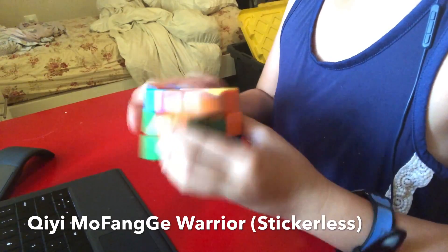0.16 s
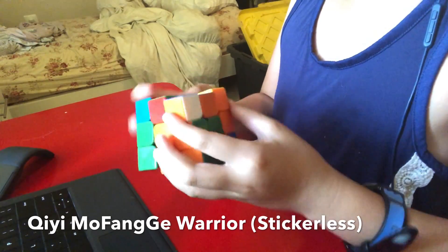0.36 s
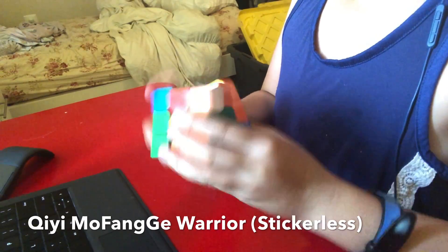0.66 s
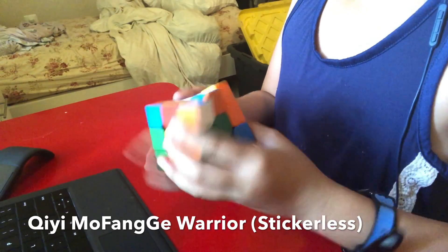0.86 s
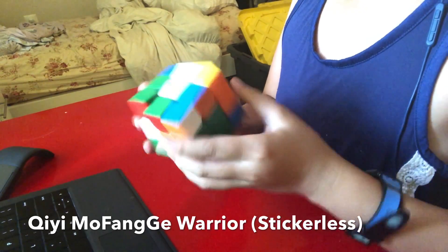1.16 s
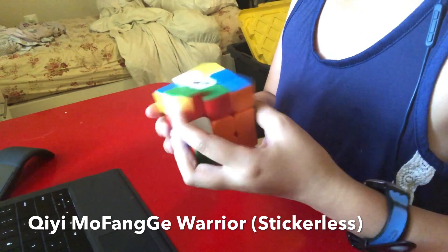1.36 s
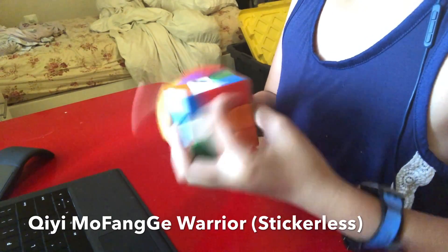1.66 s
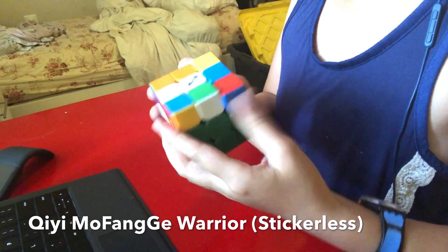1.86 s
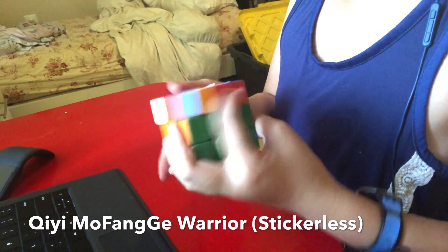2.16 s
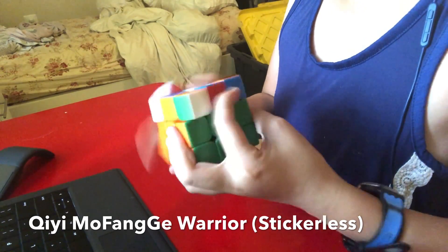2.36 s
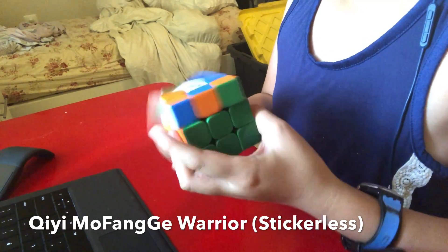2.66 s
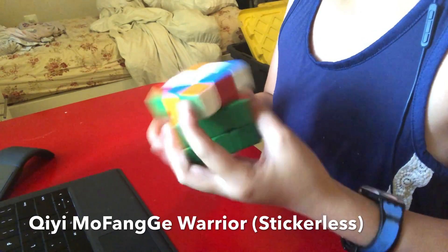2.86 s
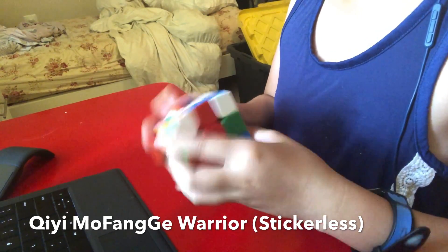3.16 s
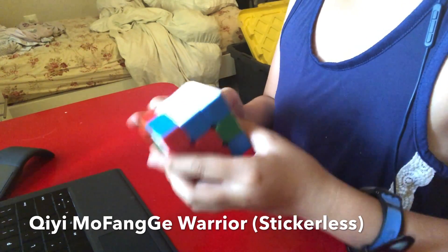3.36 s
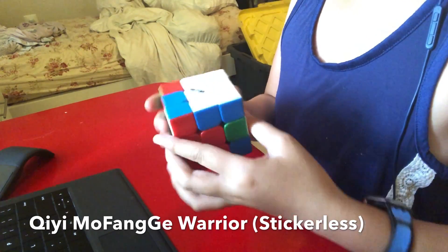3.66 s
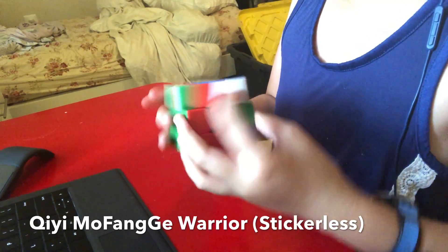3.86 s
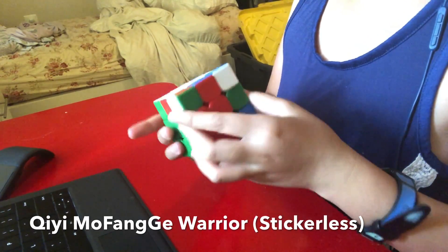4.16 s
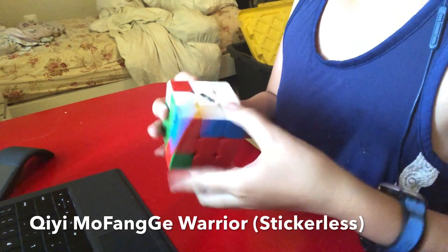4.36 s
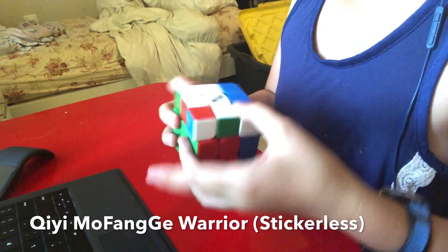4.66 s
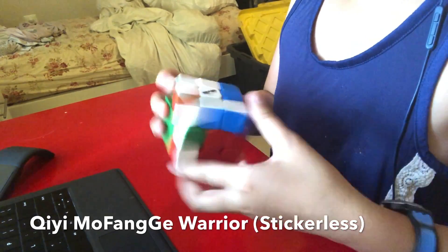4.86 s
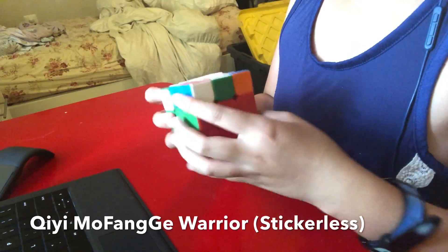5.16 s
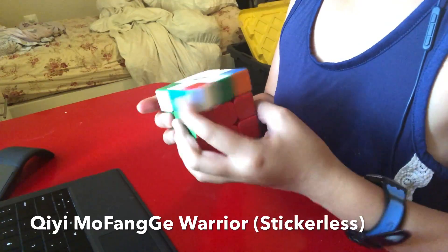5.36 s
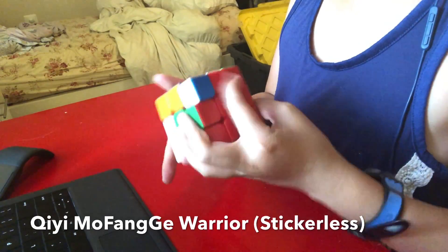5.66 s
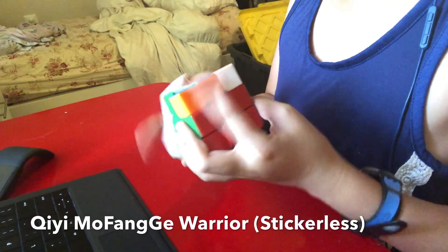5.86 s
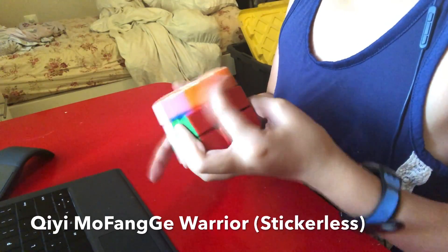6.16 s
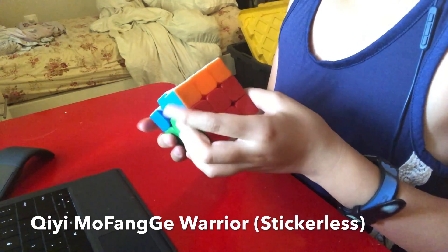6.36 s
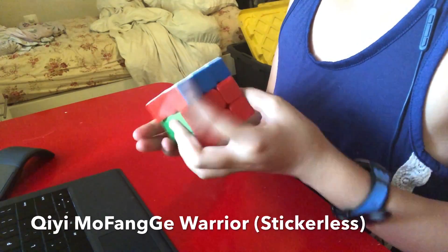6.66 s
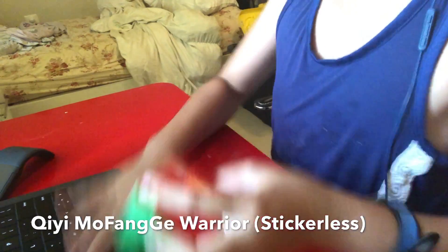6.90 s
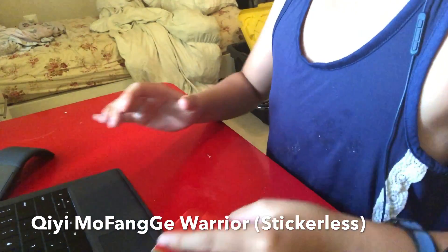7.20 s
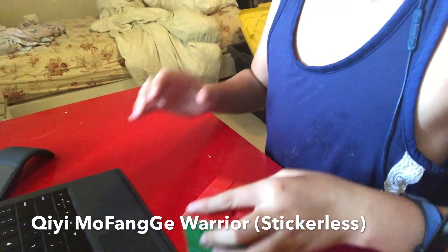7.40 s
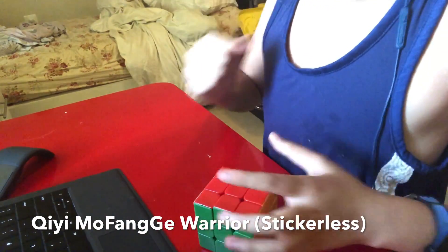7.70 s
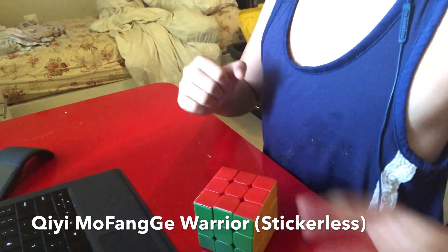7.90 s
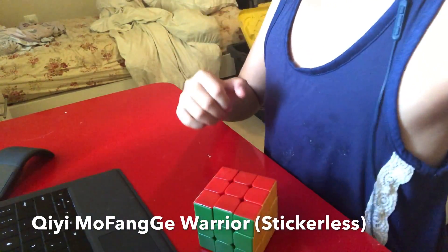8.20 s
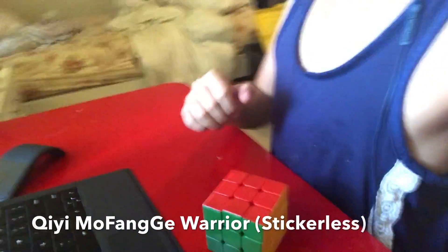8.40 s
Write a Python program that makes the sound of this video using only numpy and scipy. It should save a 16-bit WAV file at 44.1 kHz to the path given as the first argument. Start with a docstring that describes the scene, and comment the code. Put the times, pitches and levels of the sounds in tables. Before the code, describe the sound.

Rapid, dry plastic clacking with brief pauses close to the microphone, faint hum behind, ending in a hard table knock and small nudging bumps.

```python
"""A plastic puzzle cube is turned fast in two hands close to the microphone, in a small furnished room.
Hum and faint hiss run throughout; in the first four seconds a far-off engine revs up through its gears.
Each clack is a burst of tiny collisions ringing hollow plastic, with loose pieces ticking around it.
Near 7 s the cube drops on a table and is nudged about: damped modes of the top knock and boom,
the plastic ticks. Decaying noise echoes answer the cube and table; engine and hum are tones and noise bands."""
import sys
import numpy as np
from scipy import signal
from scipy.fft import rfft, irfft, next_fast_len
from scipy.io import wavfile
from scipy.ndimage import uniform_filter1d

SR = 44100
rng = np.random.default_rng(int(sys.argv[2]) if len(sys.argv) > 2 else 0)


def wav_record(signal):
    """Record a signal, one row per channel, as 16-bit PCM in the file named by sys.argv[1]."""
    frames = np.transpose(np.atleast_2d(signal))
    bounded = np.clip(frames, -1, 1)
    # unit amplitude maps onto the largest positive 16-bit level
    quanta = np.round(bounded * 32767).astype(np.int16)
    wavfile.write(sys.argv[1], SR, quanta)


N = 376613
TIME = np.arange(N) / SR  # s

# Broad room noise, relative spectrum: (frequency [Hz], density [dB per Hz])
AIR_SPECTRUM = [(24, -31), (40, -8), (96, -18), (287, -18.5), (359, -17.5), (407, -18.5), (591, -29.5),
                (704, -27.5), (1280, -34.5), (2510, -34.5), (15500, -48)]
# Wavering hum bands: (frequency [Hz], width [Hz], level [dB])
HUM_BANDS = [(49.4, 10, -71), (129.8, 3.2, -70.5), (184, 12, -72), (239, 18, -74.5), (283.7, 38, -66)]
# Far engine, one list per pull: (time [s], firing rate [Hz], level [dB])
ENGINE_PULLS = [
    [(0, 53.9, -75), (.45, 60.8, -68), (.78, 76.2, -59.5), (.92, 80, -65)],
    [(1.5, 86.7, -86.5), (2.2, 80.7, -66), (2.45, 64.2, -64), (2.8, 64, -59.5), (3.0, 72, -60),
     (3.2, 83, -67)],
    [(3.2, 50.9, -68), (3.33, 59, -49), (3.46, 69.6, -46.5), (3.56, 78, -63), (3.95, 90, -68.5)],
]
# Table top, knocking modes: (frequency [Hz], relative level [dB])
TABLE_MODES = [(330, -13.5), (480, -2), (720, 2), (1000, 0), (1300, -0.5), (1800, -21.5)]
# Table top, low booming modes: (frequency [Hz], relative level [dB])
BOOM_MODES = [(65, -6.5), (125, 6.5), (185, 2.5), (235, 8.5)]
# Cube and hand on the table top; tick and boom are relative to the knock's peak:
# (time [s], peak level [dB], plastic tick [dB], boom [dB])
TABLE_KNOCKS = [(6.922, -9, 2.5, -22), (6.934, -18, -16, -13.5), (6.974, -38, 8.5, 3),
                (7.109, -35.5, 0.5, -8.5), (7.184, -61.5, 8, 6.5), (7.384, -30.5, -2.5, -7),
                (7.411, -31.5, -8, -12), (7.443, -28, -5, -12), (7.49, -40, -11, -3),
                (7.524, -32, -18.5, -8), (8.359, -31.5, -30, -39), (8.368, -37, -22, -1.5),
                (8.393, -41, -26, -19), (8.441, -36, -41.5, -7), (8.461, -34.5, -36, -9),
                (8.492, -28.5, -40, -13), (8.52, -20, -9, -12.5)]
# Hollow plastic pieces, mid-range ring: (frequency [Hz], relative level [dB])
SHELL_MID_MODES = [(680, -20), (1420, -7.5), (1850, -3), (2250, 0), (2800, 3.5), (3350, 3)]
# Hollow plastic pieces, treble ring: (frequency [Hz], relative level [dB])
SHELL_TREBLE_MODES = [(4200, -1), (5100, -0.5), (6100, 7), (7200, 5), (8150, 1), (10200, -6.5), (12800, -4),
                      (14900, -9.5)]
# Pieces snapping against each other: (time [s], level [dB], rattle length [ms])
SNAPS = [(0.0023, -25.5, 1.65), (0.0368, -36, 0.74), (0.0894, -39, 1.3), (0.1603, -33.5, 0.68),
         (0.1713, -25.5, 3.3), (0.194, -26.5, 0.85), (0.216, -32, 3.2), (0.2271, -18, 2.6),
         (0.2498, -20.5, 12), (0.3407, -30, 3), (0.351, -33, 3.6), (0.4891, -26, 1.24), (0.518, -43, 1.1),
         (0.5764, -42, 0.8), (0.588, -42, 0.81), (0.674, -40, 1.5), (0.6873, -31.5, 0.53),
         (0.6978, -28, 3.6), (0.7275, -37.5, 0.8), (0.7422, -30.5, 1.4), (0.7495, -30.5, 1.5),
         (0.773, -26.5, 1.4), (0.826, -33.5, 1.1), (0.8311, -19, 1.5), (0.9865, -24.5, 2.1),
         (1.061, -39.5, 0.94), (1.099, -30, 1.4), (1.1086, -23.0, 0.96), (1.1317, -7, 0.92),
         (1.152, -19, 1.9), (1.278, -46, 1.1), (1.379, -53, 2), (1.42, -51, 2.1), (1.462, -21, 2.3),
         (1.4685, -24, 0.44), (1.4861, -11.0, 0.71), (1.4933, -24, 8.6), (1.569, -26.0, 1.15),
         (1.594, -26.5, 2.9), (1.6196, -27, 4.8), (1.6385, -13, 0.96), (1.6611, -17.0, 4.5),
         (1.6817, -23, 0.98), (1.7148, -26.5, 1.7), (1.7367, -19.5, 2.5), (1.746, -22.0, 4.2),
         (1.8625, -32, 1.75), (1.8894, -34.5, 1.05), (1.9073, -41, 1), (2.1459, -23.5, 1.65),
         (2.159, -17, 0.53), (2.1822, -18, 1.4), (2.201, -19, 3.3), (2.2129, -16.0, 2.5),
         (2.2223, -12.5, 3.8), (2.2395, -22, 3.5), (2.2503, -23.5, 2.2), (2.2866, -41.5, 2.7),
         (2.3076, -45.5, 5.2), (2.3132, -30.5, 1), (2.3394, -35.0, 0.45), (2.378, -29.5, 4.4),
         (2.402, -13.5, 1), (2.418, -26, 5.2), (2.449, -16.5, 2.2), (2.474, -14.5, 2.44),
         (2.564, -28.5, 2.8), (2.579, -18.5, 0.38), (2.6, -17.5, 5.4), (2.6098, -25, 0.44),
         (2.619, -23.5, 1.3), (2.6997, -23.5, 2.6), (2.7246, -15, 1.04), (2.757, -18.5, 2),
         (2.7762, -28, 0.91), (2.7859, -15, 0.61), (2.7924, -21, 2.7), (2.8157, -11.5, 1.8),
         (2.842, -18.0, 2.9), (2.9273, -19, 1.2), (2.9625, -31, 1.3), (3.095, -49, 3.1),
         (3.2036, -44.5, 1.1), (3.228, -29.0, 1.8), (3.2497, -27.0, 0.83), (3.2568, -27.5, 0.6),
         (3.2645, -21, 0.33), (3.3008, -26.5, 1.6), (3.3081, -20.5, 0.93), (3.3255, -24.5, 0.68),
         (3.353, -23, 1.2), (3.3738, -15.5, 1.46), (3.3878, -19.5, 2.3), (3.3988, -21, 0.71),
         (3.425, -28.0, 0.87), (3.9211, -36, 1.1), (3.9302, -26.5, 1.5), (3.9516, -28.0, 4.7),
         (4.3256, -27.5, 1.8), (4.364, -20.5, 0.67), (4.386, -21, 5.4), (4.3997, -13, 2.5),
         (4.4056, -10.5, 1.4), (4.4252, -22.5, 2.3), (4.4327, -16, 2), (4.4958, -25.5, 1.5),
         (4.5322, -19, 0.96), (4.5409, -28, 0.79), (4.551, -15, 1.1), (4.5596, -21, 2.7),
         (4.5739, -29, 2.4), (4.6115, -20.5, 1.2), (4.672, -24.5, 4), (4.683, -8.5, 3.1),
         (4.6937, -20, 1.6), (4.7045, -22, 1.5), (4.777, -41, 1.3), (4.89, -42, 1.4), (4.9168, -27.5, 7.8),
         (4.9232, -22, 1.4), (4.9406, -23, 4.7), (4.951, -12.5, 1.8), (5.0022, -17.5, 1.6),
         (5.0157, -14.5, 2), (5.0526, -23.5, 1.9), (5.074, -27.5, 3.3), (5.081, -27.5, 2.5),
         (5.0919, -16, 4.1), (5.0991, -13, 3.1), (5.4462, -40, 1.5), (5.457, -23, 0.96),
         (5.4808, -13, 0.62), (5.493, -30, 3.6), (5.5746, -35.5, 1.5), (5.593, -23.5, 1.9),
         (5.6186, -31, 2.7), (5.6288, -21, 0.49), (5.637, -39, 1.3), (5.6485, -24, 1.3), (5.6709, -23.5, 1),
         (5.6946, -20.5, 8.4), (5.714, -15.5, 1.8), (5.7776, -44, 1.6), (5.854, -42, 1.5),
         (5.862, -34, 2.7), (5.8711, -16.0, 1.3), (5.8863, -12, 3.3), (5.8991, -21, 3), (5.9054, -17.5, 2),
         (5.942, -25, 0.98), (5.9742, -20.0, 2.3), (6.051, -26, 6.4), (6.056, -22.0, 1.2),
         (6.0708, -17.5, 0.47), (6.0776, -13, 2.3), (6.089, -25, 0.99), (6.0961, -20.5, 4),
         (6.1, -18.5, 2.2), (6.1395, -33.5, 1.8), (6.166, -32.5, 1.5), (6.1992, -24, 2.3),
         (6.2236, -17.5, 2.3), (6.239, -10.5, 2.8), (6.2545, -16.5, 2.7), (6.278, -21.5, 1.6),
         (6.2932, -17, 1), (6.3106, -16.5, 2.5), (6.6054, -39.5, 1.3), (6.622, -21.5, 3.6),
         (6.645, -16, 0.74), (6.6553, -16, 0.41), (6.8036, -24.5, 1.1), (6.8247, -15, 1.95),
         (6.837, -24.5, 5.3)]
# Treble over mid range for a clack of medium level: (time [s], balance [dB])
TREBLE_BALANCE = [(0.2, 0), (2.4, 3.5), (6.8, 6.5)]
# Tone colour of the plastic clatter, a dip near 930 Hz and a lift near 7.6 kHz:
# (frequency [Hz], width [Hz], share added [ratio])
CLATTER_COLOUR = [(930, 500, -0.41), (7600, 1400, 0.26)]

AIR_DB = -62.5
ROOM_T60_S, ROOM_TREBLE_T60_S, ROOM_DB = 0.33, 0.28, -16
SHELL_CYCLES, TABLE_CYCLES, BOOM_CYCLES = 8, 9, 30  # cycles a mode rings until 60 dB down
TABLE_LAG_S = 0.0017  # travel time of a 1 kHz bending wave, before the common advance
SHAKE_RISE_S, SHAKE_FALL_S = 0.002, 0.0066  # time constants of the shaking energy
MEDIUM_DB = -24  # level of a medium clack
TREBLE_PER_DB = 0.66  # dB of treble balance gained per dB of level
TREBLE_SCATTER_DB = 2.5
CEILING = 1.6  # amplitude where the recorder's input stage saturates
TOP_HZ = 15750


def undb(db):
    """Turn decibels into an amplitude ratio."""
    return 10 ** (np.asarray(db) / 20)


def unit(x):
    """Scale to rms 1 along time."""
    return x / np.sqrt(np.mean(x ** 2, axis=-1, keepdims=True))


def add(track, s, sound):
    """Mix a sound in at s seconds."""
    i = max(int(s * SR), 0)
    track[i:i + len(sound)] += sound[:len(track) - i]


def shaped_noise(gain_of_hz):
    """Steady noise of rms 1 with a given gain per frequency."""
    size = next_fast_len(N)
    hz = np.arange(1, size // 2 + 2) * SR / size
    spectrum = rfft(rng.standard_normal(size)) * gain_of_hz(hz)
    return unit(irfft(spectrum, size)[:N])


def ring(modes, cycles, count, size):
    """One decaying response per blow: each lands elsewhere, so mode gains and pitches scatter."""
    hz, db = np.transpose(modes)[:, None, :, None]
    chance = rng.standard_normal((count, len(modes), 2))
    turns = hz * (1 + .07 * chance[..., :1]) * np.arange(size) / SR  # cycles elapsed
    gain = undb(db + 2.5 * chance[..., 1:])
    sign = (-1) ** np.arange(len(modes))[:, None]  # neighbours in opposite phase leave no notches
    decay = 1000. ** (-turns / cycles)
    return np.sum(sign * gain * np.sin(2 * np.pi * turns) * decay, axis=1)


def impacts(shape, per_s, spread_db):
    """Random tiny collisions of either sign, a few of them big."""
    hit = rng.random(shape) < per_s / SR
    sign = np.sign(rng.random(shape) - .5)
    return hit * sign * undb(spread_db * np.minimum(rng.exponential(size=shape), 3))


def thin(x):
    """A small body cannot radiate bass; a dip and a lift colour the rest."""
    x = signal.sosfilt(signal.butter(3, 500, "high", fs=SR, output="sos"), x)
    for hz, width_hz, share in CLATTER_COLOUR:
        x = x + share * signal.lfilter(*signal.iirpeak(hz, hz / width_hz, fs=SR), x)
    return x


def through_table(modes, cycles, count):
    """A soft push rings the top; bending waves carry the treble faster, so each knock glides down."""
    size = 16384
    hz = np.arange(size // 2 + 1) * SR / size
    push = 1 / (1 + (hz / 1600) ** 4)
    # delay falls with the root of frequency; the hz / 2 term advances all by half the lag
    travel = np.exp(-2j * np.pi * TABLE_LAG_S * (2 * np.sqrt(1000 * hz) - hz / 2))
    sound = irfft(rfft(ring(modes, cycles, count, size)) * push * travel)
    return sound[:, :size * 7 // 8]  # drop the wrapped-round end


def place_at_knocks(sounds, peak_db):
    """Lay one sound per knock, starting 1 ms ahead of its time, scaled to its peak level."""
    out = np.zeros(N)
    for knock, gain, sound in zip(TABLE_KNOCKS, undb(peak_db), sounds):
        add(out, knock[0] - .001, gain * sound / np.abs(sound).max())
    return out


def air():
    """Broad room noise with a few narrow, wavering hum bands."""
    hz0, db0 = np.transpose(AIR_SPECTRUM)
    out = undb(AIR_DB) * shaped_noise(lambda hz: undb(np.interp(np.log(hz), np.log(hz0), db0)))
    for mid_hz, width_hz, db in HUM_BANDS:
        out += undb(db) * shaped_noise(lambda hz: 1 / (1 + (2 * (hz - mid_hz) / width_hz) ** 2))
    return out


def engine():
    """Only the firing tone, one sine per pull, gets through the walls; it flutters a little."""
    out = 0
    for pull in ENGINE_PULLS:
        s, hz, db = np.transpose(pull)
        gain = uniform_filter1d(undb(np.interp(TIME, s, db, -120, -120)), 3000)
        turns = np.cumsum(np.interp(TIME, s, hz)) / SR
        out = out + np.sqrt(2) * gain * np.sin(2 * np.pi * turns)
    flutter = shaped_noise(lambda hz: 1 / (1 + (hz / 8) ** 2))
    return out * (1 + 0.27 * flutter)


def room(dry):
    """Scattered early echoes thicken into a tail; soft furnishings take the treble first."""
    t = np.arange(SR // 2) / SR
    density = np.clip((t / .03) ** 2, 0, 1)  # full after 30 ms
    echoes = rng.standard_normal(len(t)) * (rng.random(len(t)) < density)
    low = signal.sosfilt(signal.butter(2, 5000, fs=SR, output="sos"), echoes)
    tail = low * 1000. ** (-t / ROOM_T60_S) + (echoes - low) * 1000. ** (-t / ROOM_TREBLE_T60_S)
    return undb(ROOM_DB) * signal.fftconvolve(dry, tail / np.sqrt(np.sum(tail ** 2)))[:N]


def knocks():
    """The table top knocks and booms as its damped bending modes ring."""
    s, db, tick_db, boom_db = np.transpose(TABLE_KNOCKS)
    knock = place_at_knocks(through_table(TABLE_MODES, TABLE_CYCLES, len(s)), db)
    boom = place_at_knocks(through_table(BOOM_MODES, BOOM_CYCLES, len(s)), db + boom_db)
    return knock + boom


def contact_ticks():
    """The plastic ticks as it meets the table: a 10 ms burst of collisions rings the shell."""
    s, db, tick_db, boom_db = np.transpose(TABLE_KNOCKS)
    t = np.arange(441) / SR
    contact = impacts((len(s), len(t)), 19000, 0.48) * t * np.exp(-t / 0.002)
    bodies = ring(SHELL_MID_MODES + SHELL_TREBLE_MODES, SHELL_CYCLES, len(s), size=600)
    tick = signal.fftconvolve(contact, bodies, axes=1)
    return place_at_knocks(thin(tick), db + tick_db)


def loose_pieces():
    """Around every clack and knock shaken pieces tick; until the first knock a few rare ticks join in."""
    clack_s, clack_db, _ = np.transpose(SNAPS)
    knock_s, knock_db, tick_db, _ = np.transpose(TABLE_KNOCKS)
    s = np.concatenate([clack_s, knock_s])
    db = np.concatenate([clack_db, knock_db + tick_db - 8])
    energy = np.zeros(N)
    energy[(s * SR).astype(int)] = undb(1.496 * db)  # the shaking grows 0.748 dB per dB
    t = np.arange(-4410, 4410) / SR
    spread = np.exp(np.where(t < 0, t / SHAKE_RISE_S, -t / SHAKE_FALL_S))
    shake = np.sqrt(np.abs(signal.fftconvolve(energy, spread, "same")))
    # four pieces, each its own ring
    bodies = ring(SHELL_MID_MODES + SHELL_TREBLE_MODES, SHELL_CYCLES, count=4, size=900)
    bodies = bodies / np.linalg.norm(bodies, axis=1, keepdims=True)
    ticks = undb(-18.5) * shake * unit(impacts((len(bodies), N), 200, 5.4)) / 2
    ticks += undb(-47) * (TIME < knock_s[0]) * impacts(ticks.shape, 7, 1.3)
    return thin(signal.fftconvolve(ticks, bodies, axes=1).sum(axis=0)[:N])


def clacks():
    """Each clack is a swell of tiny collisions ringing the shell; harder contact is louder and brighter."""
    s, db, ms = np.transpose(SNAPS)
    treble_db = np.interp(s, *np.transpose(TREBLE_BALANCE)) + TREBLE_PER_DB * (db - MEDIUM_DB)
    treble_db = treble_db + TREBLE_SCATTER_DB * rng.standard_normal(len(s))
    t = np.arange(-441, 882) / SR
    late = t / (ms[:, None] / 1000) + 0.12  # time in rattle lengths
    rise = np.exp(-(late / 0.64) ** 2)
    fall = np.exp(-(np.abs(late) / 0.79) ** 0.84)  # slower than the rise
    swell = np.where(late < 0, rise, fall)
    blows = swell * impacts(swell.shape, 16000, 4.0)
    level = undb(db) * np.sqrt(ms / 50)  # longer rattles carry more energy
    both = np.sqrt(undb(treble_db) + undb(-treble_db))  # the two shares keep the total energy
    out = np.zeros(N + SR)
    for modes, share_db in ((SHELL_MID_MODES, -treble_db / 2), (SHELL_TREBLE_MODES, treble_db / 2)):
        bodies = ring(modes, SHELL_CYCLES, len(s), size=600)
        sounds = unit(signal.fftconvolve(blows, bodies, axes=1))
        for start, gain, sound in zip(s, level * undb(share_db) / both, sounds):
            add(out, start, gain * sound)
    return thin(out[463:N + 463])  # 10.5 ms earlier, so the swell is centred near its time


def scene():
    """Cube and table close by, with their room, over the background."""
    rest = loose_pieces() + knocks()
    # the pieces radiate a different rattle towards each of three walls
    walls = sum(room(clacks() + contact_ticks() + rest) for _ in range(3)) / np.sqrt(3)
    return (clacks() + contact_ticks() + rest + walls + engine() + air())[None]


def record(dry):
    """The microphone loses the deepest bass; the recorder rounds the loudest peaks and cuts the top steeply."""
    heard = signal.sosfilt(signal.butter(4, 38, "high", fs=SR, output="sos"), dry)
    rounded = CEILING * np.tanh(heard / CEILING)
    return signal.sosfilt(signal.ellip(10, .2, 70, TOP_HZ, fs=SR, output="sos"), rounded)


dry = scene()
out = record(dry)
wav_record(out)
```